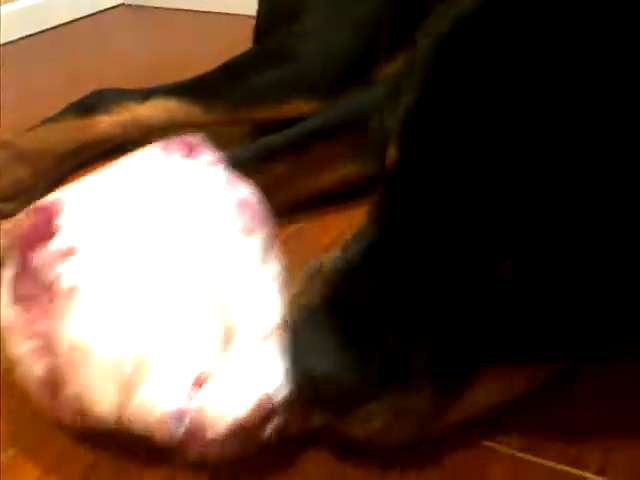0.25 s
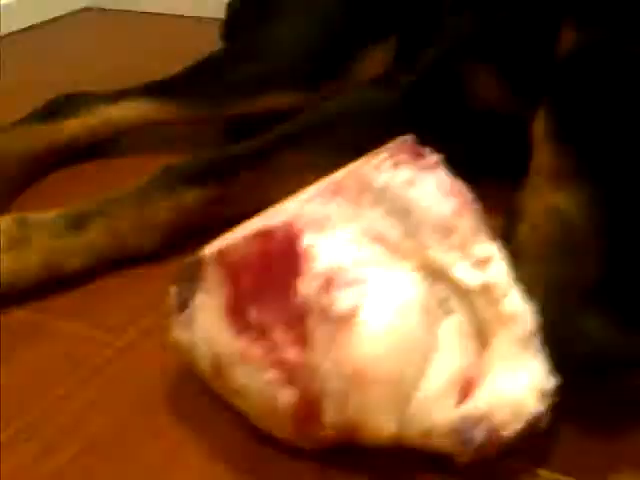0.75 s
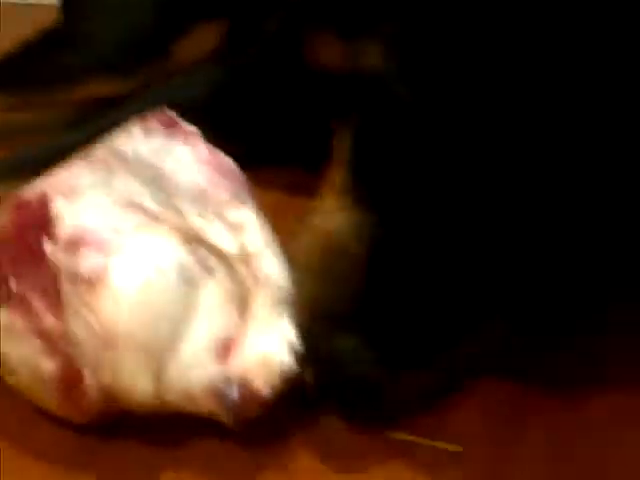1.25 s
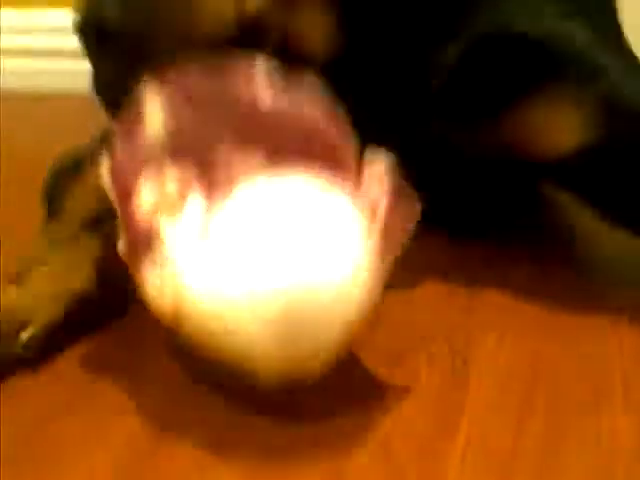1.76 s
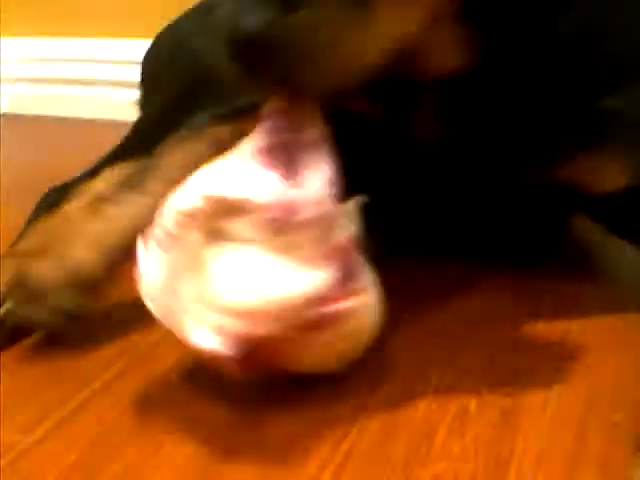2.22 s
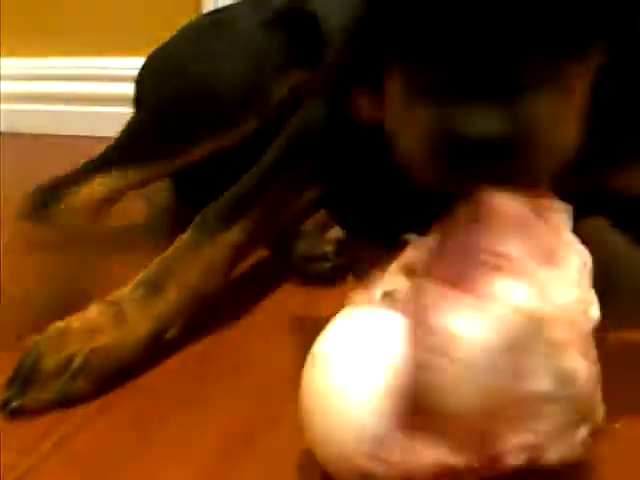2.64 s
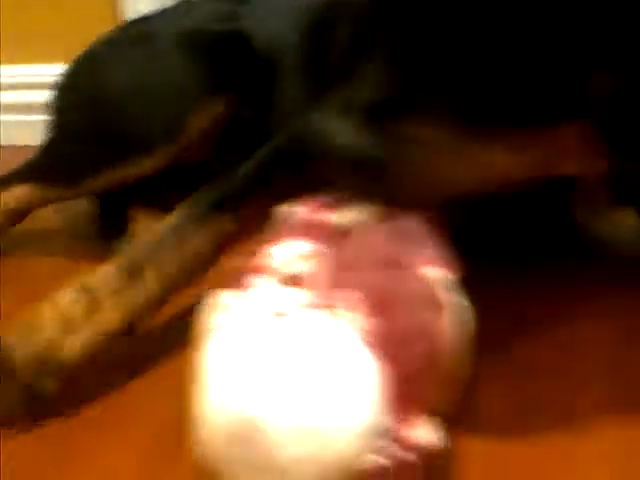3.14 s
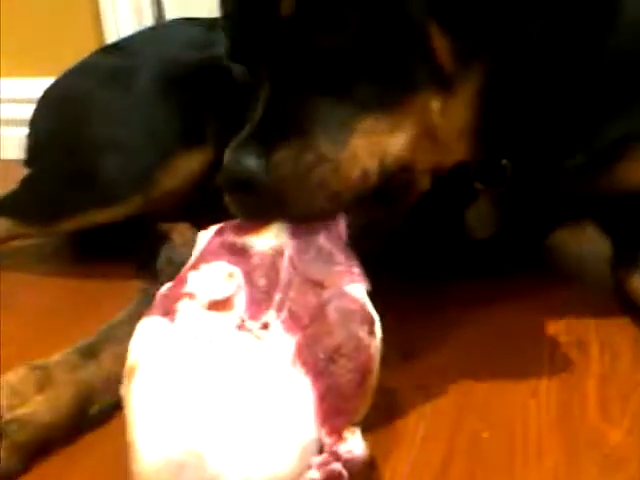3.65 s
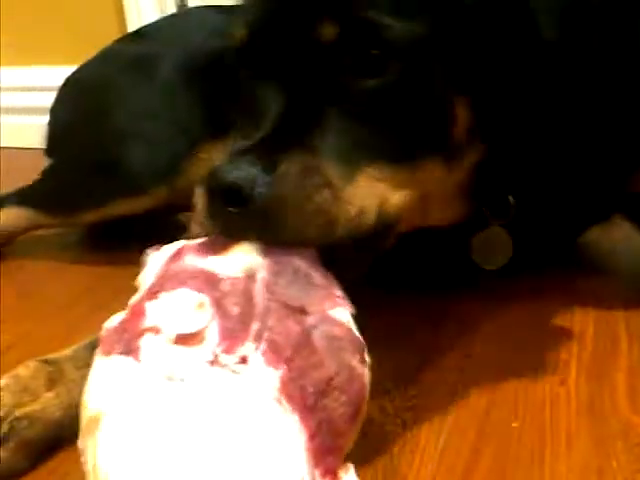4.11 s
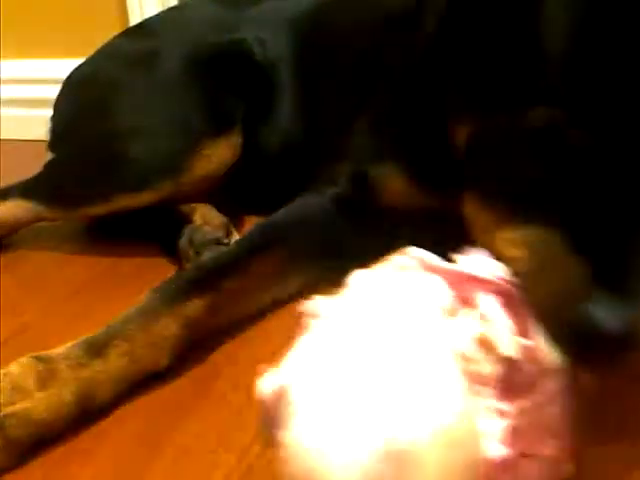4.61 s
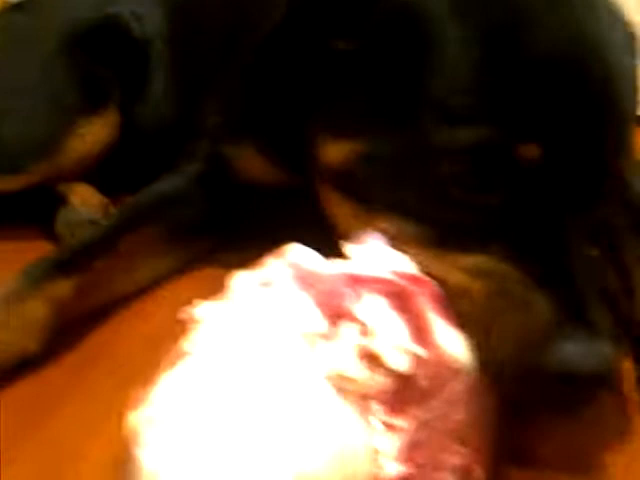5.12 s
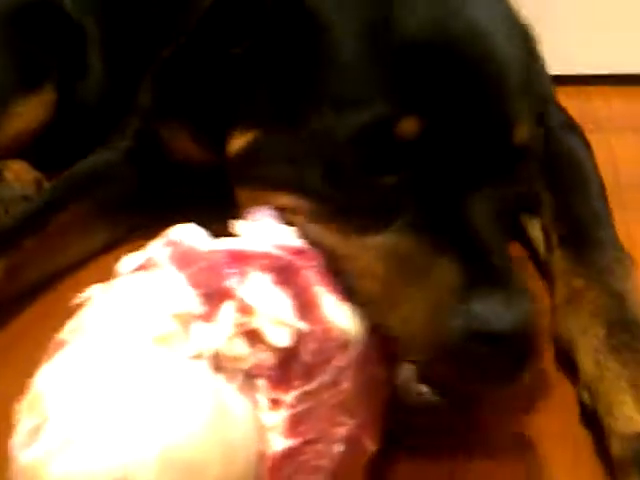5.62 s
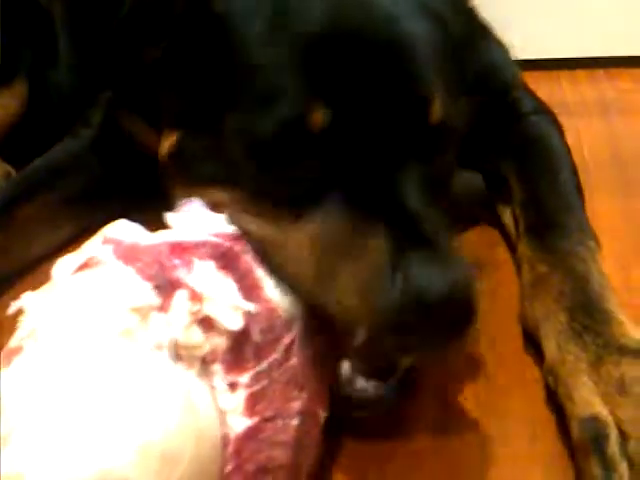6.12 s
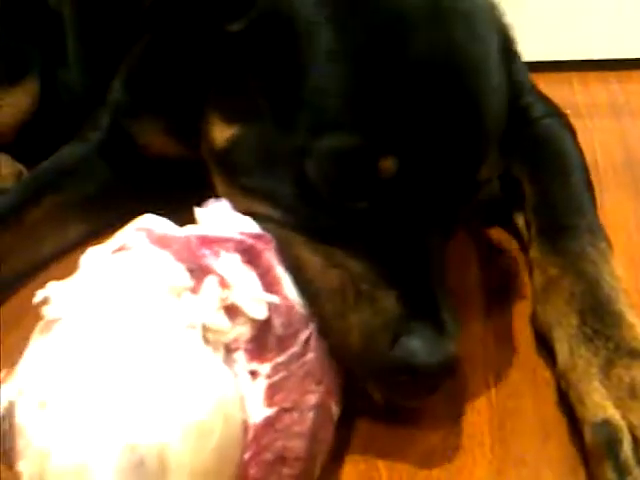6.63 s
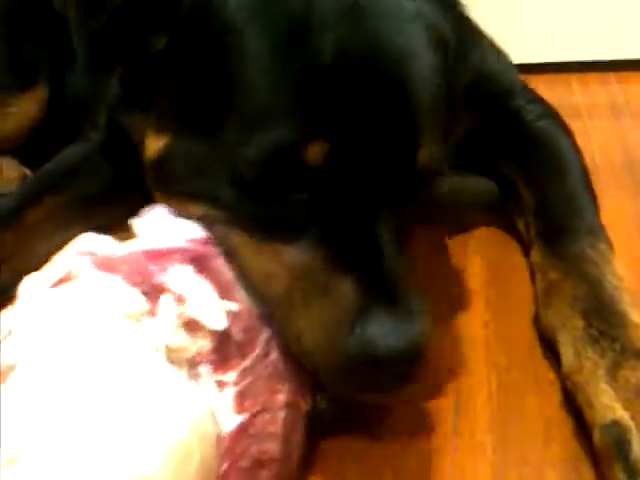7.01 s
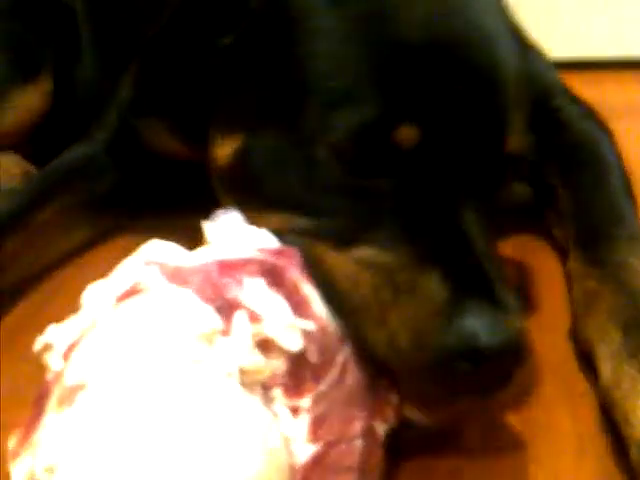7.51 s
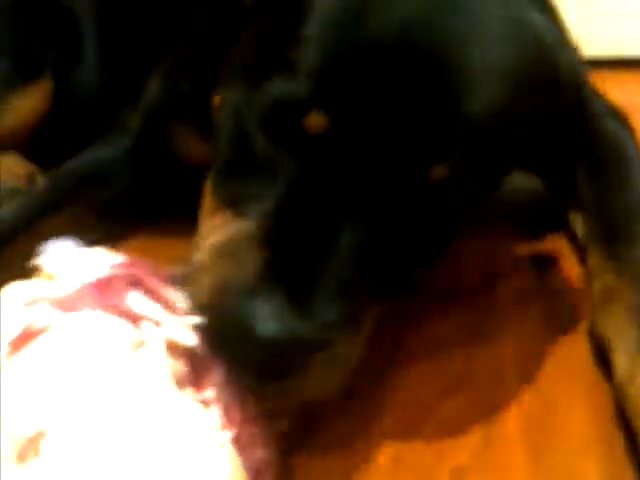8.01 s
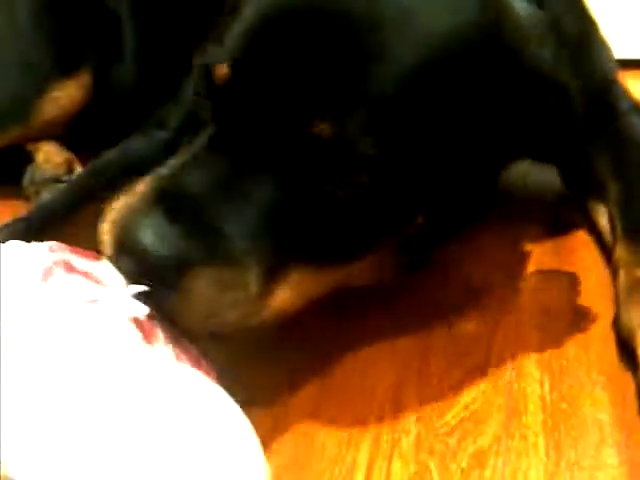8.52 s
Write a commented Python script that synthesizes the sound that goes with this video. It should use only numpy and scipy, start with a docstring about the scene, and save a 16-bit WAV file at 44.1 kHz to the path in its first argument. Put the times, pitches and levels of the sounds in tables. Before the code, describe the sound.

Close indoors, a big meaty bone rubs, rasps and knocks over floorboards, followed by a dog's soft snorts, sticky smacks and snuffling.

```python
"""A big raw bone rubs, scrapes and knocks on a wooden floor in a small room, close by, as a dog shoves it.
Teeth snap on it; then the dog settles to lick and gnaw, with wet smacks and snuffling.
Friction is random stick-slip noise through resonances; blows and bites ring sets of damped modes.
Wet clicks are tiny ringing pockets; snorts and snuffles are filtered noise. Low swells and room tone lie below."""
import sys
import numpy as np
from scipy import signal
from scipy.fft import rfft, irfft
from scipy.io import wavfile

SR = 44100
rng = np.random.default_rng(int(sys.argv[2]) if len(sys.argv) > 2 else 0)


def master(y):
    """Save y as 16-bit WAV."""
    cut = np.clip(np.atleast_2d(y).T, -1, 1)
    pcm = np.round(cut * 32767)  # scale
    wavfile.write(sys.argv[1], SR, pcm.astype(np.int16))


N = 385875
TIME = np.arange(N) / SR
RING = np.arange(8192) / SR  # time axis of one short event, s

# licks and snuffles, muzzle on the bone: start_s, length_s, level_db, brightness_db, mouth_resonance_hz
LICKS = [(5.584, 0.11, -47, -4.5, 538), (5.711, 0.1, -47, -4.5, 557), (5.787, 0.047, -46, 1, 550),
         (5.893, 0.053, -47, 0, 555), (6.044, 0.036, -60, -4.5, 900), (6.23, 0.062, -56, -7, 767),
         (6.302, 0.15, -54, -10, 745), (6.552, 0.07, -54.5, 0, 623), (7.109, 0.12, -53, -10, 650),
         (7.251, 0.079, -64, -3, 696), (7.525, 0.049, -49.5, -0.5, 716), (7.597, 0.12, -65.5, -6, 717),
         (7.944, 0.035, -55, -15, 650), (8.048, 0.059, -53, -5.5, 620), (8.132, 0.15, -61, -1, 680),
         (8.584, 0.1, -54, -5.5, 558)]
LICK_ATTACK_S, LICK_SAG_DB, LICK_RELEASE_S = 0.027, -1, 0.012  # the tongue presses, draws along and lifts


def amp(db):
    """Decibels to gain."""
    return 10 ** (np.asarray(db) / 20)


def evened(x):
    """Scales to rms 1."""
    return x / np.sqrt(np.mean(x ** 2) + 1e-20)


def peaked(x):
    """Scales to peak 1."""
    return x / abs(x).max()


def read(points, hz):
    """Reads a table on a log-frequency axis."""
    f, value = np.transpose(points)
    return np.interp(np.log(hz + 1), np.log(f + 1), value)


def add(mix, s, sound):
    """Mixes a sound in at time s."""
    part = mix[max(round(s * SR), 0):][:len(sound)]
    part += sound[:len(part)]


def colour(x, points):
    """Minimum-phase filter with the given spectrum, so clicks keep sharp fronts."""
    hz = abs(np.fft.fftfreq(4096, 1 / SR))
    log_gain = np.log(amp(np.maximum(read(points, hz), -100)))
    taps = np.fft.ifft(np.exp(np.conj(signal.hilbert(log_gain)))).real
    return signal.oaconvolve(x, taps[:len(taps) // 2])[:len(x)]


def band(x, lo_hz, hi_hz):
    """Gentle band-pass."""
    edges_hz = [lo_hz, min(hi_hz, SR / 2 - 1)]
    return signal.sosfilt(signal.butter(2, edges_hz, "band", fs=SR, output="sos"), x)


def split(x, hz):
    """The parts of a steady sound below and above hz, each at rms 1."""
    z = rfft(x)
    low = 1 / (1 + (np.fft.rfftfreq(N, 1 / SR) / hz) ** 6)
    return evened(irfft(z * low, N)), evened(irfft(z * (1 - low), N))


def resonate(x, hz, width_hz):
    """A resonance that follows the curve hz: shift to 0 Hz, smooth, shift back."""
    turn = np.exp(2j * np.pi * np.cumsum(hz) / SR)
    r = np.exp(-np.pi * width_hz / SR)
    return (turn * signal.lfilter([1 - r], [1, -r], x / turn)).real


def flutter(hz, depth_db):
    """Random unsteadiness of a gain, varying up to about hz."""
    z = rfft(rng.standard_normal(N)) * np.exp(-(np.fft.rfftfreq(N, 1 / SR) / hz) ** 2)
    return evened(amp(depth_db * evened(irfft(z, N))))


def slips(per_s, spread_db, smooth):
    """Stick-slip: random tiny jerks of uneven size, over smooth friction noise."""
    size = amp(spread_db * np.minimum(rng.exponential(1, N), 4)) * rng.choice([-1, 1], N)
    jerks = evened(size * (rng.random(N) < per_s / SR))
    return evened(jerks + smooth * rng.standard_normal(N))


def stroke(length, attack_s, sag_db, release_s):
    """Gain of one movement: it builds, changes by sag_db while it lasts, then dies away."""
    t = np.arange(0, length + 6 * release_s, 1 / SR)
    rise = np.sin(np.pi / 2 * np.minimum(t / attack_s, 1))
    sag = amp(sag_db * np.minimum(t / length, 1))
    return rise * sag * np.exp(-np.maximum(t - length, 0) / release_s)


def strokes(starts, lengths, levels_db, attack_s, sag_db, release_s):
    """Gain of a series of like movements; where they overlap, their powers add."""
    power = np.zeros(N)
    for s, length, db in zip(starts, lengths, levels_db):
        add(power, s, (amp(db) * stroke(length, attack_s, sag_db, release_s)) ** 2)
    return np.sqrt(power)


def strike(modes, tilt_db, scatter_db, detune, sustain=1):
    """One blow on a set of modes; the place of contact changes their mix, a firm hold shortens them."""
    hz, db, t60 = np.transpose(modes)[:, :, None]
    share, shift = rng.standard_normal((2, len(modes), 1))
    level_db = db + tilt_db * np.log2(hz / hz.mean()) + scatter_db * share
    decay = np.exp(-np.log(1000) * RING / (t60 * sustain))
    ring = amp(level_db) * decay * np.sin(2 * np.pi * hz * (1 + detune * shift) * RING)
    return peaked(ring.sum(0))


def burst(decay_s):
    """A very short puff of noise."""
    return rng.standard_normal(len(RING)) * np.exp(-RING / decay_s)


def crack(lo_hz, hi_hz, splinter_db, decay_s):
    """One sharp break of contact with a few splinters after it, band-limited with a steep upper edge."""
    x = amp(splinter_db) * burst(decay_s)
    x[0] += 1
    top = signal.butter(4, min(hi_hz, SR / 2 - 1), fs=SR, output="sos")
    return peaked(signal.sosfilt(top, band(x, lo_hz, hi_hz)))


def sticky(hz, ring_s=.0009):
    """One tiny bubble of saliva: it snaps and rings for a moment at hz."""
    t = RING[:1024]
    pop = np.sin(2 * np.pi * hz * t) * np.exp(-t / ring_s)
    snap = burst(decay_s=0.001)[:len(t)]
    return peaked(band(pop + amp(-11) * snap, lo_hz=hz * 0.36, hi_hz=hz * 1.6))


def shoves():
    """The bone judders over the boards, ringing higher or lower as it rolls; the drier it drags, the more grit."""
    # bone shoved along the boards: start_s, length_s, level_db, grit_db, contact_resonance_hz
    shove_events = [(0, 0.06, -48.5, -3, 476), (0.114, 0.19, -67.5, 2, 400), (0.317, 0.045, -55.5, 0, 364),
                    (0.362, 0.08, -53.5, 0, 490), (.44, 0.1, -51, -1.5, 469), (0.556, 0.12, -49, -4, 259),
                    (0.989, 0.28, -52.5, -4, 520), (1.274, 0.094, -48, 0.5, 520),
                    (1.413, 0.039, -49.5, 1, 373), (1.474, 0.047, -49, -16, 400),
                    (1.553, 0.2, -52.5, -7, 426), (1.809, 0.049, -50, -9, 463), (1.951, 0.15, -42, -7, 400),
                    (2.112, 0.11, -51.5, -2, 403), (2.277, 0.49, -57, -7.5, 450),
                    (2.652, 0.074, -43.5, -7, 377), (2.751, 0.114, -51.5, -13, 390),
                    (2.877, 0.097, -41.5, -7, 390), (3.015, 0.17, -52.5, -1.5, 405),
                    (3.194, 0.099, -46, -11.5, 280), (3.35, 0.078, -52.5, -6, 394),
                    (3.447, 0.12, -65.5, 1.5, 386), (4.24, 0.11, -59.5, -11.5, 255)]
    # friction spectrum: freq_hz, gain_db
    shove_spectrum = [(35, -19.5), (60, -8), (120, -15.5), (177, -2), (250, -1.5), (400, -1), (700, -4),
                      (1100, -14.5), (1310, -13.5), (1500, -13), (1820, -18), (2520, -21.5), (4080, -35),
                      (4580, -33), (6000, -44), (7800, -66), (13200, -120)]
    shape = dict(attack_s=0.015, sag_db=-1.5, release_s=0.031)  # takes hold, eases a little and stops
    judder = slips(per_s=550, spread_db=2.0, smooth=1.0) * flutter(hz=49.6, depth_db=3.0)
    body, grit = split(colour(judder, shove_spectrum), hz=770)
    s, length, db, grit_db, contact_hz = np.transpose(shove_events)
    contact_curve_hz = np.interp(TIME, s + length / 2, contact_hz)
    ring = evened(resonate(body, contact_curve_hz, width_hz=136))
    body = evened(ring + amp(-8) * body)
    return body * strokes(s, length, db, **shape) + grit * strokes(s, length, db + grit_db, **shape)


def rasp():
    """The bone's rough edge catches in dense, bright slips."""
    # scrapes of the rough edge: start_s, length_s, level_db
    rasp_events = [(1.406, 0.078, -56.5), (1.453, 0.12, -41), (1.624, 0.21, -47), (1.79, 0.13, -41.5),
                   (1.965, 0.23, -44.5), (2.02, 0.11, -40.5), (2.066, 0.071, -34), (2.28, 0.21, -49),
                   (2.499, 0.084, -46), (2.737, 0.49, -49), (2.885, 0.2, -35.5)]
    # scrape spectrum: freq_hz, gain_db
    rasp_spectrum = [(410, -34.5), (700, -44.5), (1030, -3.5), (1150, -2.5), (1460, -1.5), (2370, -0.5),
                     (2780, -2), (3290, -9.5), (4210, -5.5), (6720, -20), (7490, -35), (9740, -69),
                     (16500, -120)]
    grains = slips(per_s=750, spread_db=-2.0, smooth=0.96) * flutter(hz=65.4, depth_db=2.5)
    # the edge catches hard, then slides free
    gain = strokes(*np.transpose(rasp_events), attack_s=0.028, sag_db=-22, release_s=0.015)
    return evened(colour(grains, rasp_spectrum)) * gain


def knocks():
    """The heavy bone thumps the boards; its meat cushions the blow, with a faint hard contact on top."""
    # bone dropping and rocking: time_s, peak_db, tilt_db_per_octave, lowest_moved_hz, share_of_free_ring_time
    knock_events = [(.509, -35.5, -5.5, 184, 0.64), (0.57, -37.5, -11, 170, 0.92),
                    (.5895, -30, 5, 178, 0.38), (.628, -38, -9.5, 169, 1.5), (1.464, -24, 5.5, 160, 0.27),
                    (1.482, -31, -2, 260, 1), (1.511, -34.5, -2, 262, 1.1), (1.583, -38, 4, 300, 0.89),
                    (1.9063, -5, 1.5, 94.2, 1), (1.9519, -24, -10, 250, 0.74), (1.968, -28, -10, 70, 0.51),
                    (1.979, -28, -4, 150, 0.74), (1.997, -25, 3, 70, 0.65), (2.204, -37, 10.5, 250, .7),
                    (2.667, -30.5, 4, 170, 0.48), (2.684, -31.5, 8.5, 200, 1.4),
                    (2.708, -25.5, -7, 148, 0.91), (2.753, -32.5, 9, 200, 0.87),
                    (3.1149, -13.5, 0.5, 196, 0.8), (3.134, -16.5, 0.8, 210, 1.04),
                    (3.160, -18.5, 1, 201, 0.95), (3.2291, -30, -7, 160, 0.39),
                    (3.240, -34, 2.5, 163, 0.38), (4.5895, -22, 0.5, 98, 0.27),
                    (4.627, -37.5, -1.5, 200, .5)]
    # floor modes: freq_hz, level_db, t60_s
    board_modes = [(108.6, -25, 0.16), (182.4, -14, 0.15), (241, -7, 0.034), (310, -6, 0.032),
                   (377.6, 1, 0.045), (508, -8.5, 0.021), (707, -12.5, 0.0082), (940, -5.5, 0.012),
                   (1062, -8.5, 0.012), (1234, -17, 0.02), (1910, -35.5, 0.012)]
    out = np.zeros(N)
    cushion = 1 - np.exp(-RING / .0013)
    for s, db, tilt_db, weight_hz, sustain in knock_events:
        contact = peaked(band(burst(decay_s=0.004), lo_hz=605, hi_hz=3000))
        ring = cushion * strike(board_modes, tilt_db, scatter_db=1.5, detune=0.012, sustain=sustain)
        thump = band(ring, lo_hz=weight_hz, hi_hz=2370)
        thump = peaked(band(thump, lo_hz=weight_hz / 2, hi_hz=3000))
        add(out, s, amp(db) * (thump + amp(-24.5 + tilt_db) * contact))
    return out


def bites(bounce_s=0.00177):
    """A tooth slips off the bone and the jaw snaps: a crack, a short ring and its bounce off the floor."""
    # teeth snapping: time_s, peak_db, tilt_db_per_octave, crack_db
    bite_events = [(.8101, -15.5, 1, -6), (.8138, -24.5, 2, -12), (.8289, -21.5, -2.5, -9),
                   (.8404, -21, 1, -17), (.8555, -36, -6, -9), (1.4642, -28.5, 3, -7),
                   (4.572, -40.5, 8.5, -13), (5.0387, -19.5, 4.5, -10.5), (5.0529, -24, -1, -9),
                   (5.0636, -28, 1, -7), (5.0814, -28, -3, -13), (5.0896, -30, -6, -11.5)]
    # tooth and bone modes: freq_hz, level_db, t60_s
    bone_modes = [(418, 0.5, 0.037), (620, 4, 0.024), (840, 10.5, 0.01), (1060, 0, 0.02), (1384, 4, 0.046),
                  (1597, -2.5, 0.028), (2040, -4, 0.024), (2420, -18, 0.14), (2580, -10, 0.076),
                  (2870, -7.5, 0.016), (3350, -8.5, 0.012), (4170, -6.5, 0.008)]
    # lips and meat muffle the snap: freq_hz, gain_db
    jaw_spectrum = [(60, -43), (200, -8), (350, 11), (2600, 4.5), (3300, -2.5), (4500, -19), (5400, -27.5),
                    (7500, -31)]
    out = np.zeros(N)
    for s, db, tilt_db, crack_db in bite_events:
        crunch = peaked(band(burst(decay_s=.0022), lo_hz=700, hi_hz=3500))
        ring = strike(bone_modes, tilt_db, scatter_db=0.5, detune=0.035)
        ring = peaked(colour(ring + amp(-2.5) * crunch, jaw_spectrum))
        break_ = crack(lo_hz=1100, hi_hz=3800, splinter_db=-14, decay_s=0.00098)
        snap = amp(db) * peaked(ring + amp(crack_db) * break_)
        add(out, s, snap)
        add(out, s + bounce_s, amp(-11.5) * snap)
    return out


def ticks():
    """Hard points of teeth and claws snap drily; the sharper the point, the higher its band."""
    # hard ticks: time_s, peak_db, lowest_hz, highest_hz
    tick_events = [(.612, -40, 1500, 3300), (1.362, -36.5, 2200, 6500), (1.497, -28, 2500, 4500),
                   (1.8218, -27, 1000, 4500), (1.8417, -30, 2000, 4500), (2.047, -26, 2200, 5600),
                   (2.382, -19, 1500, 6200), (2.514, -35.5, 1400, 4530), (2.793, -26, 1100, 4530),
                   (2.8952, -24.5, 1500, 4300), (2.9085, -20, 1400, 4850), (2.916, -22.5, 1500, 4550),
                   (2.923, -23, 1800, 4900), (2.93, -21.5, 1000, 3500), (3.471, -43.5, 3300, 5000),
                   (4.352, -50, 2000, 4840), (4.892, -50.5, 3000, 6000)]
    out = np.zeros(N)
    for s, db, lo_hz, hi_hz in tick_events:
        add(out, s, amp(db) * crack(lo_hz, hi_hz, splinter_db=-10.5, decay_s=0.0013))
    return out


def smacks(ring_s=0.0021, rise_per_s=16, overtone=2.5):
    """A film of saliva breaks: the small pocket behind it rings upward, with a fine spray."""
    # loudest wet clicks of tongue, lips and meat: time_s, peak_db, pocket_pitch_hz, spray_db (also the overtone)
    smack_events = [(.029, -34.5, 500, 0), (.755, -42, 1380, -33), (1.134, -35, 1870, 2.5),
                    (1.213, -36.5, 1900, -5), (1.318, -33, 1410, -9), (4.068, -34, 690, -5.5),
                    (4.083, -33.5, 550, -5), (5.267, -39.5, 1070, -3), (5.280, -39, 830, -2),
                    (5.447, -41.5, 1970, 8.5), (5.461, -43, 650, -6), (5.561, -37, 546, -39),
                    (6.322, -37, 716, -10), (6.509, -48, 1720, -13), (6.585, -39, 1400, -3.5),
                    (6.727, -39.5, 1670, -32), (6.757, -40, 1850, 1), (6.788, -47.5, 1110, -1),
                    (6.845, -44.5, 1580, 2.5), (6.864, -45, 1880, -6), (6.977, -39, 1840, 4.5),
                    (7.001, -48, 1490, 4.5), (7.173, -39, 1670, -15), (7.203, -44, 1520, -7),
                    (7.213, -41, 1810, -9), (7.335, -46, 740, -15), (7.447, -43, 1740, -3.5),
                    (7.461, -38.5, 1640, -15), (7.489, -36.5, 1860, -5.5), (7.649, -44.5, 1900, 1),
                    (7.821, -43, 1760, 0.5), (7.841, -47, 1690, -10), (8.052, -39.5, 686, -17),
                    (8.201, -43.5, 1090, -10), (8.358, -49, 1790, -13.5)]
    out = np.zeros(N)
    for s, db, hz, spray_db in smack_events:
        phase = 2 * np.pi * hz * RING * (1 + rise_per_s / 2 * RING)
        pocket = np.sin(phase) + amp(spray_db - 13.5) * np.sin(overtone * phase)
        pocket = pocket * np.exp(-RING / ring_s)
        spray = peaked(band(burst(decay_s=0.0065), lo_hz=820, hi_hz=4200))
        smack = band(pocket + amp(spray_db - 10.5) * spray, lo_hz=398, hi_hz=5250)
        add(out, s, amp(db) * peaked(smack))
    return out


def saliva(clicks_per_s=12, quietest_db=-58, crackle_per_s=110):
    """Faint sticky clicks of varied pitch throughout; they crowd together as the tongue peels off the meat."""
    out = np.zeros(N)
    for when, size, pitch in rng.random((round(clicks_per_s * N / SR), 3)):
        add(out, when * N / SR, amp(quietest_db + 9.0 * size) * sticky(1400 * 2 ** pitch))
    for s, length, db, bright_db, _ in LICKS:
        for when, size, pitch in rng.random((round(crackle_per_s * length), 3)):
            click = sticky(1330 * 2 ** (1.33 * pitch))  # 1.33 octaves up from 1330 Hz
            click_db = db + bright_db / 2 - 2 + 13 * size ** 2
            add(out, s + LICK_ATTACK_S / 2 + when * length, amp(click_db) * click)
    return out


def snuffles():
    """Air passes the resonances of the dog's muzzle; the lowest moves with the jaw."""
    # muzzle spectrum: freq_hz, gain_db
    muzzle_spectrum = [(180, -47), (300, -5), (529, -0.5), (707, 1), (969, -5), (1180, -7.5), (1370, -3.5),
                       (1460, -7), (1580, -1.5), (2080, -8), (2250, -14.5), (3350, -24.5), (3900, -31),
                       (5170, -34.5), (7000, -89.5), (9100, -109), (15400, -120)]
    air = slips(per_s=300, spread_db=2.5, smooth=1.1) * flutter(hz=110, depth_db=1.5)
    hollow, hiss = split(colour(air, muzzle_spectrum), hz=1240)
    s, length, db, bright_db, mouth_hz = np.transpose(LICKS)
    jaw_hz = np.interp(TIME, s + length / 2, mouth_hz)
    hollow = evened(amp(-5.5) * hollow + evened(resonate(hollow, jaw_hz, width_hz=100)))
    shape = LICK_ATTACK_S, LICK_SAG_DB, LICK_RELEASE_S
    low = hollow * strokes(s, length, db, *shape)
    return low + amp(-1.5) * hiss * strokes(s, length, db + bright_db, *shape)


def snorts():
    """The dog blows through its nose against the meat: shaped noise in short puffs."""
    # snorts: start_s, length_s, level_db
    snort_events = [(3.709, 0.091, -50.5), (3.881, 0.037, -55), (3.958, 0.075, -50.5), (4.035, 0.038, -38),
                    (4.094, 0.032, -45.5)]
    # snort spectrum: freq_hz, gain_db
    snort_spectrum = [(76, -32), (130, -21), (360, -0.5), (432, -5), (701, -11), (801, -5.5), (870, -12.5),
                      (1140, -13.5), (2110, -29), (2660, -29.5), (7000, -50.5), (9100, -77.5),
                      (15400, -120)]
    air = evened(colour(rng.standard_normal(N), snort_spectrum))
    # a puff swells, holds and dies
    return air * strokes(*np.transpose(snort_events), attack_s=0.06, sag_db=1, release_s=0.026)


def rumbles(start_hz=200, end_hz=85):
    """Dull swells of low noise, each through a broad resonance that sinks as it passes."""
    # soft low swells: middle_s, level_db, length_s
    rumble_events = [(2.269, -56.5, 0.32), (2.535, -58.5, 0.42), (3.622, -54, 0.2), (3.853, -57, 0.39),
                     (4.258, -55.5, 0.26), (4.953, -55, 0.15), (5.326, -59, 0.18), (5.765, -53.5, 0.19),
                     (6.668, -58, 0.21), (7.001, -60, 0.11), (8.392, -61.5, 0.16)]
    # swell spectrum: freq_hz, gain_db
    rumble_spectrum = [(25, -9.5), (70, -2.5), (180, 0), (270, -10), (450, -13.5), (1000, -62.5),
                       (3000, -90)]
    out = np.zeros(N)
    for s, db, length in rumble_events:
        hz = np.geomspace(start_hz, end_hz, round(length * SR))
        low = resonate(rng.standard_normal(len(hz)), hz, width_hz=540)
        low = evened(colour(low, rumble_spectrum))
        add(out, s - length / 2, amp(db) * low * signal.windows.cosine(len(hz)))
    return out


def hush(level_db=-62.5):
    """Steady room tone and microphone hiss: shaped noise."""
    # room tone spectrum: freq_hz, gain_db
    hush_spectrum = [(15, -25), (30, -6.5), (65, 2), (120, 0), (285, -2), (380, 1), (520, -4), (700, -2),
                     (1100, -6), (1900, -12.5), (3700, -19.5), (5200, -21.5), (6700, -21.5), (7500, -27.5)]
    return amp(level_db) * evened(colour(rng.standard_normal(N), hush_spectrum))


def room(x, build_s=0.0012):
    """A small bare room: dense random reflections, each band dying at its own speed."""
    # reverberation time: freq_hz, t60_s
    decay_times = [(100, 0.53), (400, 0.45), (1000, 0.5), (3000, 0.56), (7000, 0.68)]
    # reverberation spectrum: freq_hz, gain_db
    room_spectrum = [(80, 5.5), (178, 3), (260, 0), (378, -5), (520, 1.5), (1200, -0.5), (3000, 2),
                     (7000, 4.5)]
    taps = rng.choice([-1., 1.], SR) * (rng.random(SR) < 4000 / SR)  # about 4000 reflections per s
    hz, t, z = signal.stft(taps, SR, nperseg=256)
    decay = np.exp(-np.log(1000) * t / read(decay_times, hz)[:, None])
    tail = signal.istft(z * decay, SR, nperseg=256)[1]
    tail = tail * (1 - np.exp(-(TIME[:len(tail)] / build_s) ** 2))
    return colour(signal.fftconvolve(x, tail / np.linalg.norm(tail))[:N], room_spectrum)


def scene():
    """Bone, mouth and floor, in three groups, each with its own share and pattern of reflections."""
    teeth, thumps, wet, points = bites(), knocks(), smacks() + saliva(), ticks()
    friction, nose = shoves() + rasp(), snorts() + snuffles()
    direct = teeth + thumps + wet + points + friction + nose
    bone_room = room(amp(-6.0) * thumps + amp(-5.5) * friction)
    teeth_room = room(amp(-6.0) * teeth + amp(-9.0) * points)
    mouth_room = room(amp(-7.5) * wet + amp(-7.0) * nose)
    return (direct + bone_room + teeth_room + mouth_room + rumbles() + hush())[None]


def record(dry, edge_hz=7380):
    """Narrow band limit: a steep linear-phase low-pass."""
    taps = signal.firwin(301, edge_hz, window=("kaiser", 8), fs=SR)
    return signal.oaconvolve(dry, taps[None], "same")


dry = scene()
out = record(dry)
master(out)
```